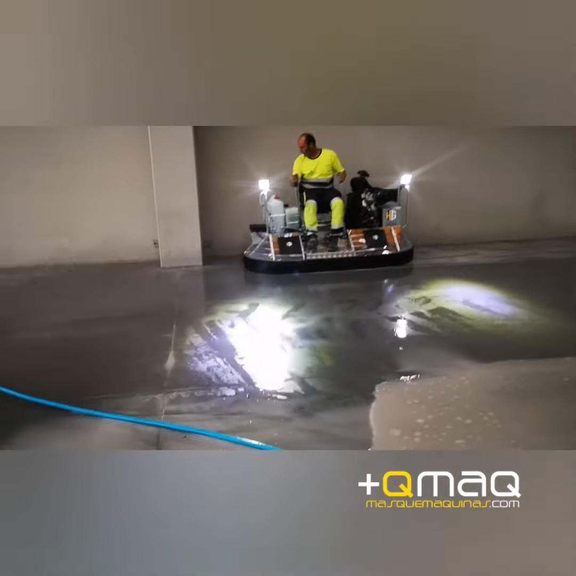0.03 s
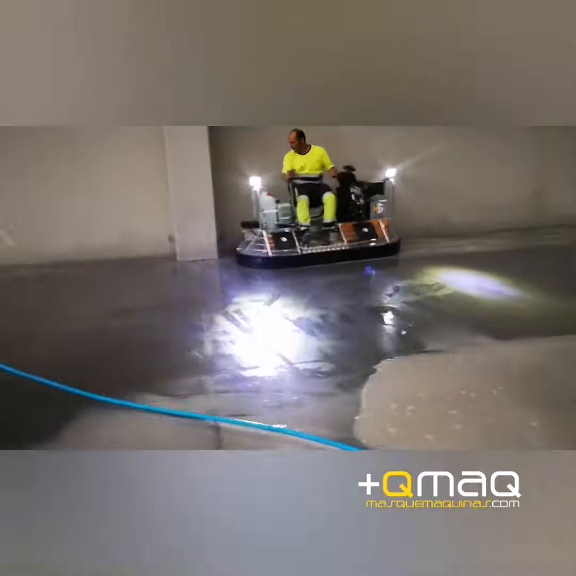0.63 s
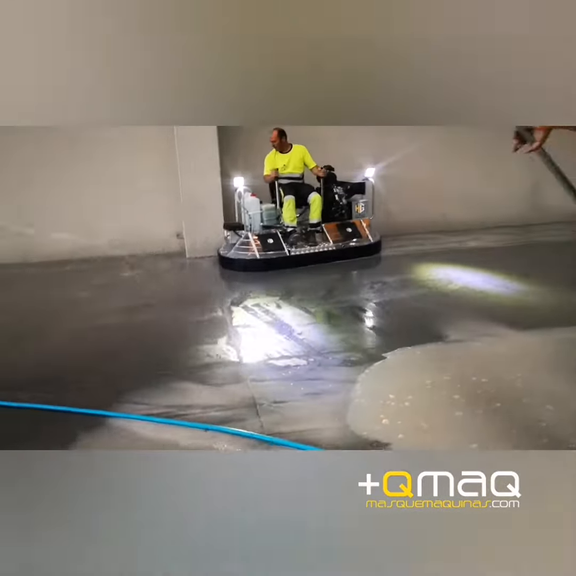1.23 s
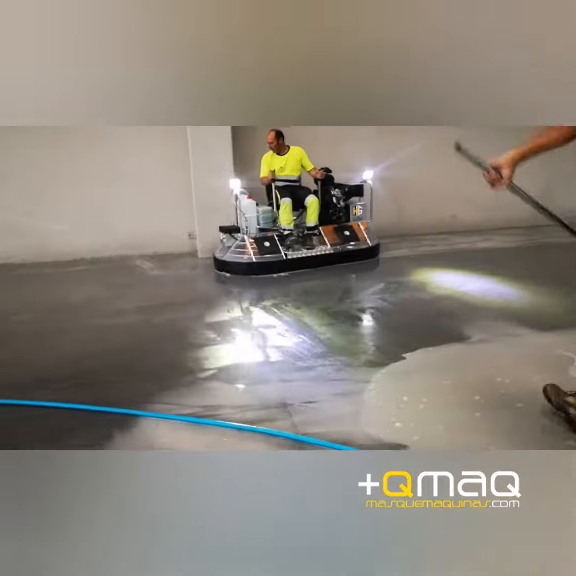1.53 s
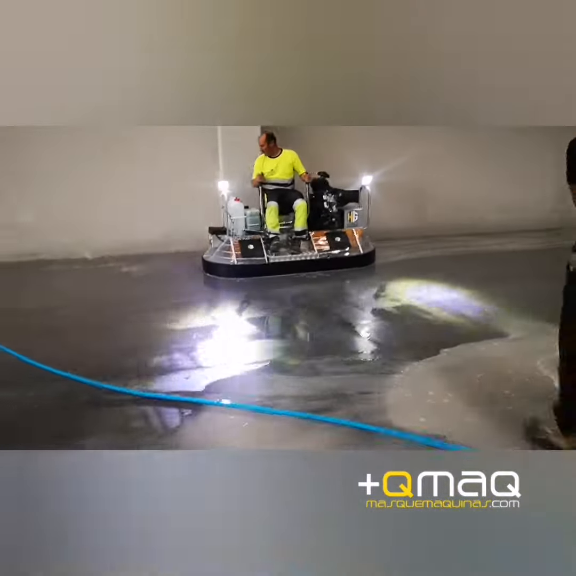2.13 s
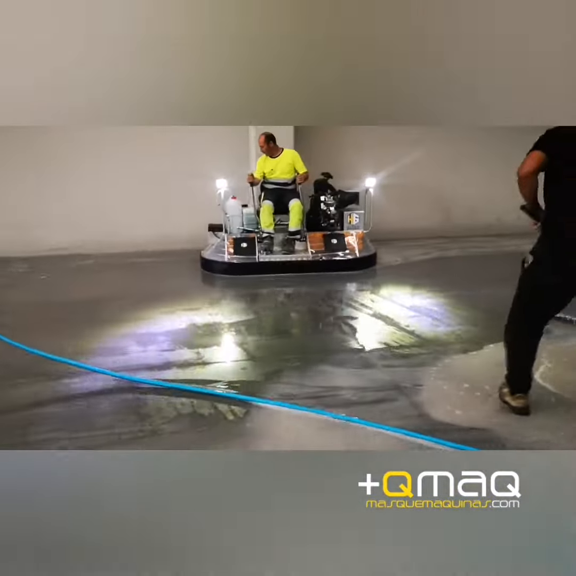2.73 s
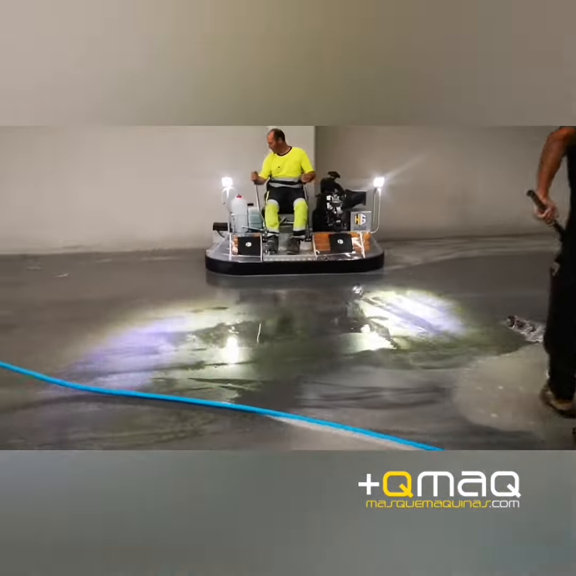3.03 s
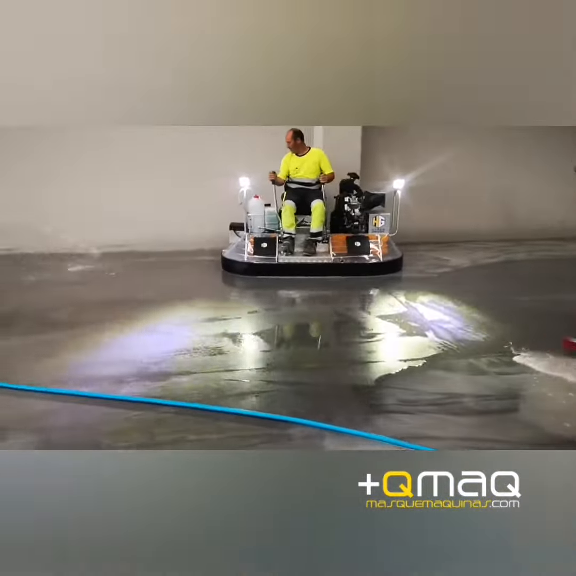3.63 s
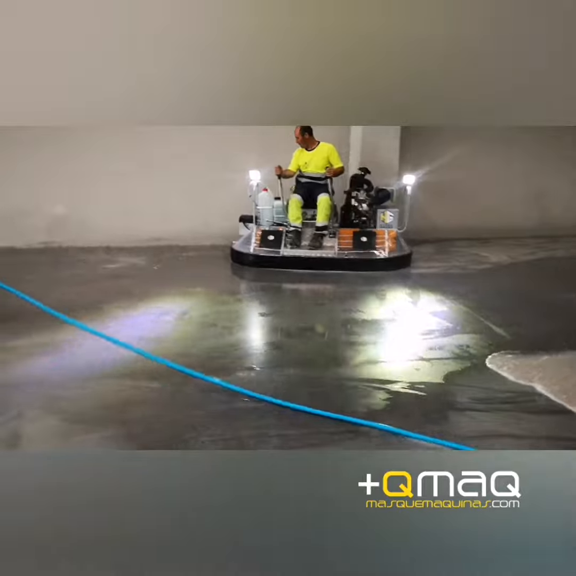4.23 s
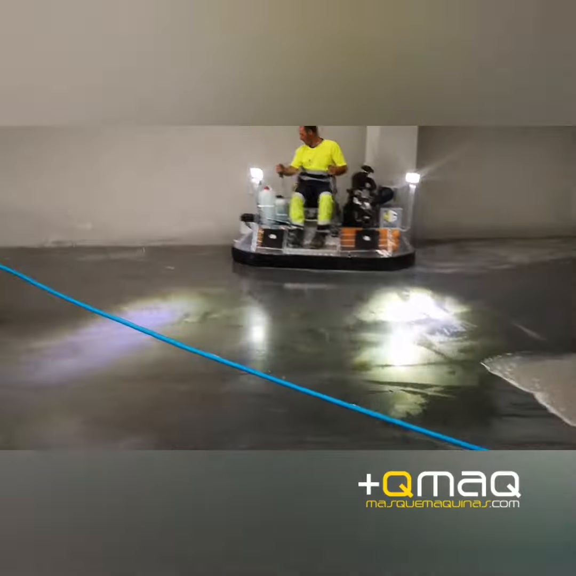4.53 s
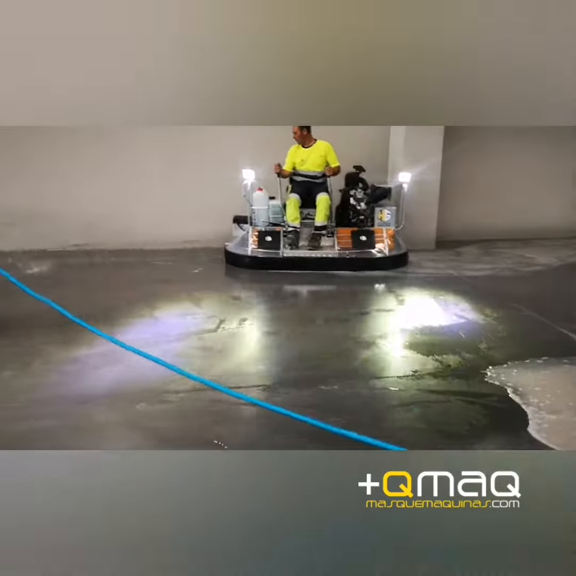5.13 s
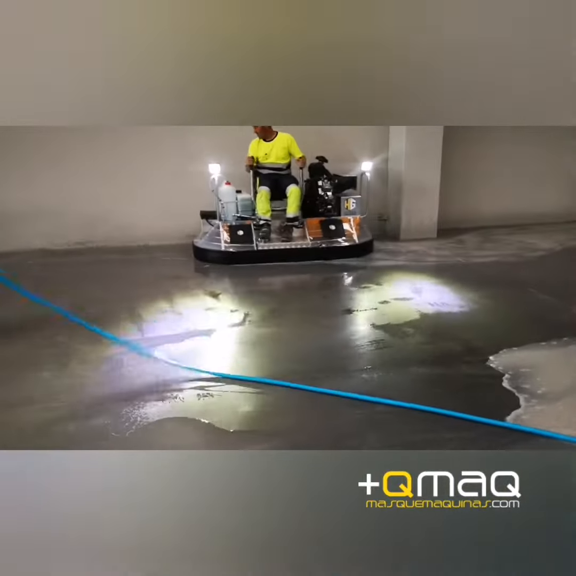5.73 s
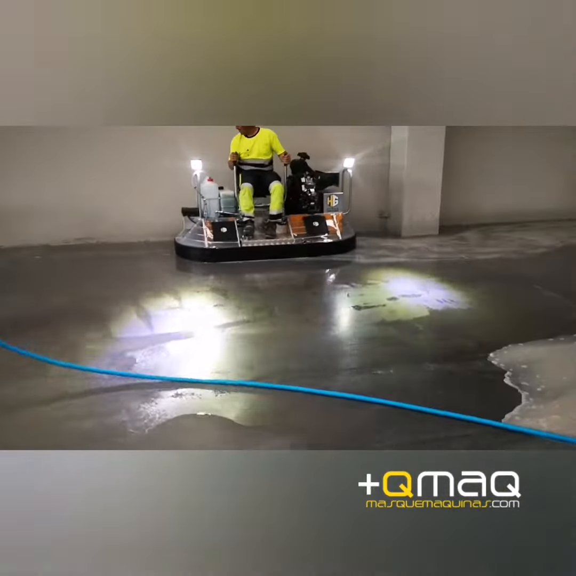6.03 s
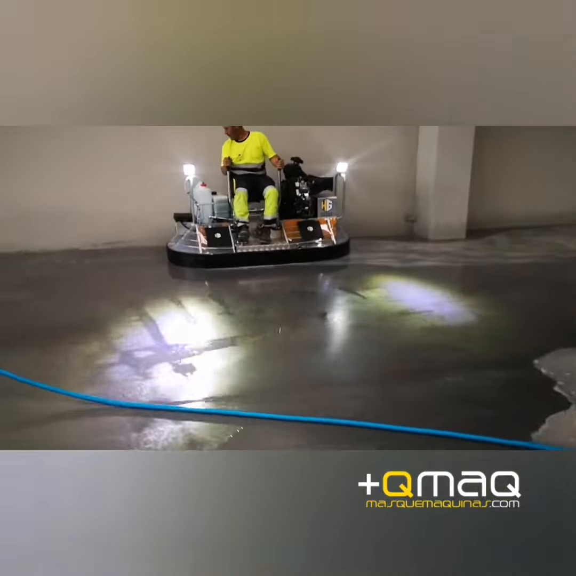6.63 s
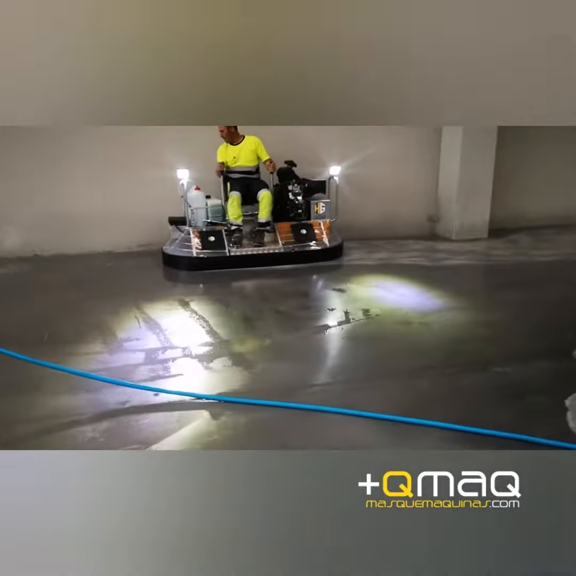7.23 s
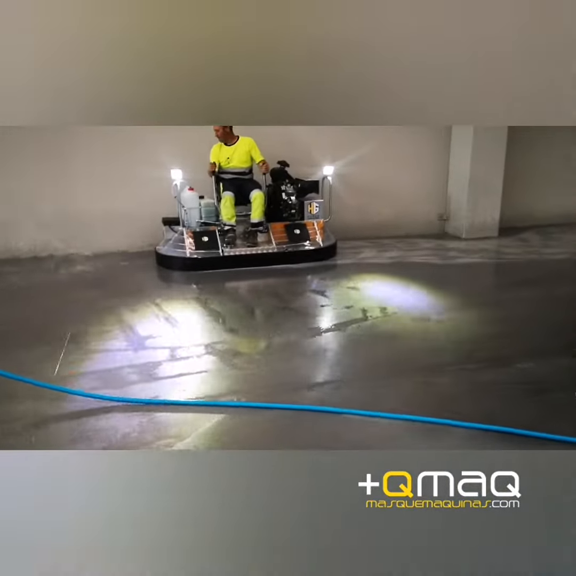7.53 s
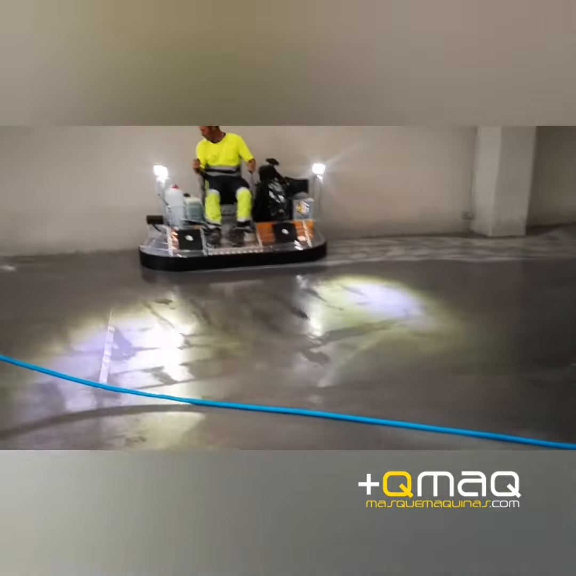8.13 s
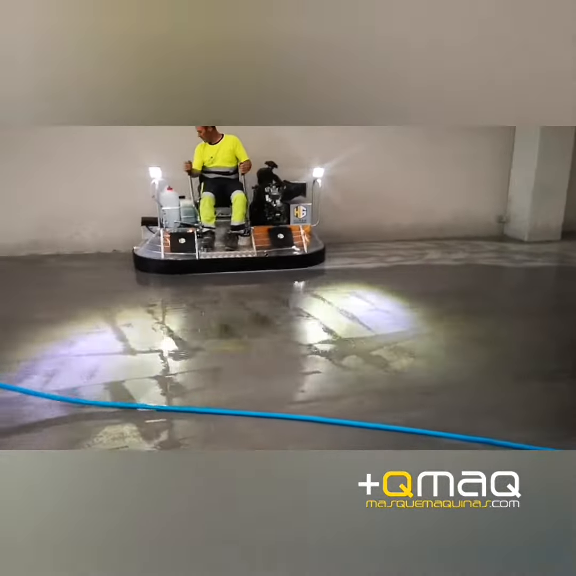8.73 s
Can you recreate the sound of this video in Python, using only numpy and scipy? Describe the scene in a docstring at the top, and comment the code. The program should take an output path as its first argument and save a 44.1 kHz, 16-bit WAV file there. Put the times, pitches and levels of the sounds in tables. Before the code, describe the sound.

Low, swelling engine drone of a floor polishing machine with a gritty, ringing rasp of discs on concrete, echoing indoors.

```python
"""Floor polisher in a bare hall

A ride-on polisher glides over wet concrete, its twin-cylinder engine droning and revving up once.
Each low exhaust harmonic swells and fades as the machine moves through the hall's standing waves.
Over the drone the discs grind, ring and squeak, the cooling fan whines and the valves tick faintly."""
import sys
import numpy as np
from scipy import signal
from scipy.fft import rfft, irfft, next_fast_len
from scipy.io import wavfile
from scipy.ndimage import uniform_filter1d, minimum_filter1d, map_coordinates

SR = 44100
rng = np.random.default_rng(int(sys.argv[2]) if len(sys.argv) > 2 else 0)


def unload_audio(sound):
    """Save the sound as a 16-bit wav file, at the path given as the first command line argument."""
    columns = np.transpose(np.atleast_2d(sound))
    # keep every value between -1 and 1, then stretch to whole-number steps
    steps = np.round(np.clip(columns, -1, 1) * 32767)
    wavfile.write(sys.argv[1], SR, steps.astype(np.int16))


N = 387638

# Level rides of exhaust harmonics 2, 3, 5 and 6 through the standing waves: t/s, level/dB
RIDE_2 = [(0.0, -22.5), (0.58, -19.5), (0.92, -24.5), (1.84, -18.5), (2.65, -20.5), (3.16, -14.0),
          (3.64, -15.5), (3.84, -22.5), (4.8, -15.5), (5.2, -20.0), (6.5, -24.0), (7.35, -14.5),
          (8.78, -13.0)]
RIDE_3 = [(0.0, -17), (0.58, -16.5), (1.16, -13.5), (2.35, -21.5), (2.79, -38), (3.23, -22), (4.46, -15.5),
          (4.66, -19.5), (4.76, -35), (4.97, -18), (5.75, -19), (5.85, -17), (5.95, -11), (7.48, -22),
          (8.2, -15.5), (8.78, -27)]
RIDE_5 = [(0.0, -24), (0.65, -31), (0.82, -21.5), (2.86, -19), (3.54, -44), (3.78, -19.5), (4.12, -16.5),
          (4.69, -40), (5.85, -18.5), (7.04, -16.5), (7.45, -27.5), (7.72, -12.5), (8.27, -22.5),
          (8.78, -16.5)]
RIDE_6 = [(0.0, -15.5), (1.94, -17), (2.48, -35), (2.86, -22), (3.5, -17), (3.64, -26), (3.88, -15.5),
          (4.22, -30.5), (4.9, -21.5), (5.03, -31.5), (5.41, -16.5), (6.02, -27.5), (6.9, -17.5),
          (7.14, -23.0), (8.33, -17), (8.78, -27.5)]
STRONG_HARMONICS = {2: RIDE_2, 3: RIDE_3, 5: RIDE_5, 6: RIDE_6}
# Fill of the drone: harmonic number, low-throttle level/dB, high-throttle level/dB
WEAK_HARMONICS = [(4, -35, -29.5), (7, -31, -34.5), (9, -39, -42.5), (10, -36, -39), (11, -41, -41),
                  (12, -43.5, -61), (13, -41, -52.5), (14, -52, -53.5), (17, -61, -57.5), (19, -62.5, -55),
                  (20, -58, -58), (21, -55, -75), (34, -62, -60), (36, -56, -49), (40, -74, -56)]
# Extra ride on harmonics 9 to 11: t/s, level/dB
UPPER_RIDE = [(.2, -3.5), (1.3, 4), (2.1, 0.5), (2.8, 2), (3.7, -2.5), (5.3, 1), (6.7, -3), (7.5, 4),
              (8.7, -0.5)]
# Tone of the exhaust gas: f/Hz, level/dB
PUFF_EQ = [(15, -24), (35, -5), (90, -7.5), (170, 0), (260, -8.5), (340, -12.5), (420, -14.5), (500, -11),
           (570, -28.5), (900, -50), (2000, -60)]
# Bite of the discs on the slab: t/s, rasp level/dB, grit level/dB
BITE_RIDE = [(0.1, -32, -37), (0.55, -32, -35.5), (1.53, -34.5, -37), (2.13, -31, -32.5),
             (3.07, -30, -33.5), (3.47, -32.5, -37), (4.86, -29, -33), (5.46, -32, -34.5), (5.63, -28, -31),
             (5.7, -30.5, -33.5), (6.11, -34.5, -37.5), (6.25, -33, -36.5), (6.73, -35, -38.5),
             (7.31, -31.5, -35), (8.48, -34, -37), (8.7, -33.5, -37)]
# Midrange rasp of the grinding: f/Hz, level/dB
RASP_EQ = [(200, -14), (450, -7), (650, -4), (880, 0.5), (1100, 0), (1310, -3.5), (1600, -1), (2200, 0.5),
           (2720, -2.5), (2850, -3.5), (3150, -6), (3500, -13.5), (6000, -45)]
# Bright hiss of the grit: f/Hz, level/dB
GRIT_EQ = [(1500, -13), (3400, -1), (3900, 1), (4250, 0), (4950, -0.5), (5400, 1.5), (5850, 3),
           (6300, -2.5), (7100, 2.5), (7900, 0.5), (8300, -4.5), (8900, -6), (10000, -19), (15000, -21.5)]
# Resonances of the discs and their housings: f/Hz, width/Hz, level/dB
DISC_MODES = [(870, 20, -6.5), (1376, 31, -6), (2150, 30, -10), (2686, 68, -2), (3243, 59, -5.5),
              (3837, 180, -8), (4497, 160, -8.5), (5380, 70, -9), (6950, 70, -7.5)]
# Swell of the singing disc: t/s, level/dB
SINGING_RIDE = [(1.6, -52), (2.3, -40), (4.1, -40), (4.6, -38), (6.3, -52.5), (7.6, -39.5), (8.79, -45)]
# Moments when a disc catches: t/s, f/Hz, half length/s, level/dB
DISC_CATCHES = [(2.52, 7100, 0.055, -36), (2.73, 7080, .03, -50), (4.33, 4500, 0.033, -38)]
# Decay of the hall: f/Hz, T60/s
HALL_DECAY = [(100, 2.6), (1000, 1.5), (4000, 0.54), (12000, .5)]
# Stereo image of the scattered noise: f/Hz, left-right correlation
STEREO_CORRELATION = [(60, .999), (130, 0.98), (290, .88), (450, 0.17), (700, 0.16), (1400, 0.28),
                      (3000, 0.11), (15000, 0.06)]
# Balance of the whole mix: f/Hz, left minus right level/dB
STEREO_TILT = [(400, 0), (750, 0.5), (1300, -1.2), (2400, -5.5), (4400, -0.5), (6000, -2), (7200, -2.5),
               (9000, 3), (15000, -1)]

REV_S, REV_LENGTH_S = 5.5, 0.3  # when the throttle opens, and how long that takes


def engine():
    """Throttle (0-1), running count of firing cycles and unevenness of the firing, sample by sample."""
    t = np.arange(N) / SR
    throttle = np.clip((t - REV_S) / REV_LENGTH_S, 0, 1)
    low_hz = 21.73 + 0.06 * t  # creeps up
    high_hz = 24.82 - 0.28 * (t - REV_S)  # sags under the load
    hunt_hz = 0.0403 * wobble(2)  # the governor never quite holds the speed
    cycle_hz = low_hz + throttle * (high_hz - low_hz) + hunt_hz
    rev_stumble = np.exp(-((t - REV_S - REV_LENGTH_S) / 0.52) ** 2)
    return throttle, np.cumsum(cycle_hz) / SR, 0.057 + 0.21 * rev_stumble


def exhaust(cycles, throttle, rough):
    """The drone: strong harmonics ride the standing waves, the 8th dips at nodes, weak ones wander."""
    throb = harmonic(cycles, 1, drift=0.25, spread=0.01, rough=rough)
    drone = amp(-41 + 13 * throttle) * throb
    for k, ride in STRONG_HARMONICS.items():
        sway_db = 0.43 * wobble(4)  # the machine shifts about
        db = curves(ride)[0] + 0.84 + sway_db
        drone += amp(db) * harmonic(cycles, k, drift=0.5, spread=0.014, rough=rough)
    first_node_s, node_gap_s, wall_echo = 1.595, 1.65, 0.45
    nodes = (np.arange(N) / SR - first_node_s) / node_gap_s
    standing_wave = np.abs(1 - wall_echo * np.exp(2j * np.pi * nodes))
    eighth = harmonic(cycles, 8, drift=0.3, spread=0.015, rough=rough)
    drone += amp(-28 - 4 * throttle) * standing_wave * eighth
    upper_db, = curves(UPPER_RIDE)
    for k, low_db, high_db in WEAK_HARMONICS:
        db = low_db + throttle * (high_db - low_db) + 2 * wobble(3.487)
        if 9 <= k <= 11:
            db += upper_db
        drone += amp(db) * harmonic(cycles, k, drift=0.65, spread=0.026, rough=rough + 0.18)
    return drone


def harmonic(cycles, k, drift, spread, rough):
    """One exhaust partial; the changing path turns its phase, a little differently left and right."""
    phase = 2 * np.pi * (k * cycles + rng.random()) + drift * wobble(0.76)
    stereo_phase = spread * k * wobble(0.95) * np.array([[1], [-1]])
    strength = 1 + rough * wobble(24)  # firings differ in punch
    jitter = rough * wobble(24)  # and in timing
    return np.sqrt(2) * strength * np.sin(phase + stereo_phase + jitter)


def rev_flutter(drone):
    """During the rev the hall still holds the lower pitches, which beat against the new ones."""
    t = np.arange(N) / SR
    send = np.exp(-((t - REV_S - REV_LENGTH_S / 2) / (REV_LENGTH_S / 2)) ** 2)
    echo = hall(drone.mean(0) * send).mean(0)
    peak_rms = np.sqrt(uniform_filter1d(echo ** 2, size=SR // 4).max())
    return amp(-20) * echo / peak_rms


def discs(cycles, rasp_db, grit_db, throttle):
    """Abrasive discs rasp and hiss over the slab, swelling as they turn, and their metal rings."""
    def modes(hz):
        return np.sqrt(sum((amp(db) * resonance(hz, f, width)) ** 2 for f, width, db in DISC_MODES))
    turning = np.sin(2 * np.pi * 2.9 * np.arange(N) / SR)
    rasp = amp(rasp_db + 2 + 0.14 * turning + 0.55 * wobble(25)) * noise_bed(RASP_EQ)
    valve_ticks = 1 + 0.087 * strokes(cycles, offset=0.077, decay=0.11)
    hiss = amp(grit_db + 2.5 + 0.1 * turning + 0.55 * wobble(40)) * valve_ticks * noise_bed(GRIT_EQ)
    ring = amp(grit_db - 5 - throttle + 2.5 * wobble(9)) * diffuse(modes)
    return rasp + hiss + ring


def puffs(cycles, load_db):
    """Turbulent gas chuffs out of the silencer with every firing, more of it under load."""
    db = load_db + 0.4 + 0.4 * wobble(4.35)
    pulsing = 1 + 0.12 * strokes(cycles, offset=0.375, decay=0.26)
    return amp(db) * unit(noise_bed(PUFF_EQ) * pulsing)


def fan(cycles, level_db):
    """The cooling fan whines at 60 times the shaft speed, shaken by each firing, blurred by the hall."""
    shaft_turns = 2 * cycles
    shake = 1.4 * wobble(90) + 1.4 * np.sin(2 * np.pi * cycles)
    whine = np.sin(2 * np.pi * 60 * shaft_turns + shake)
    return amp(level_db) * hall(whine)


def singing_disc():
    """One sharp resonance of a disc, kept ringing unevenly by friction."""
    db = curves(SINGING_RIDE)[0] + wobble(8)
    return amp(db) * diffuse(lambda hz: resonance(hz, centre_hz=2912, width_hz=60))


def squeaks():
    """Brief, thin squeals as a disc catches on the wet slab."""
    t = np.arange(N) / SR
    out = np.zeros((2, N))
    for at_s, hz, half_s, db in DISC_CATCHES:
        waver = 0.69 * np.array([wobble(100), wobble(83)])
        envelope = amp(db) * np.exp(-((t - at_s) / half_s) ** 2)
        out += envelope * np.sqrt(2) * np.sin(2 * np.pi * hz * t + waver)
    return out


def hall(x):
    """Fully wet reverb at rms 1, its tail darkening as it dies; the source is already sounding."""
    hz, t, noise = signal.stft(rng.standard_normal((2, SR)), SR, nperseg=256)
    decay = amp(-60 * t / along(HALL_DECAY, hz)[:, None])
    tail = signal.istft(noise * decay, SR)[1]
    pre_rolled = np.pad(x, (SR, 0), mode="reflect")
    return unit(signal.fftconvolve(pre_rolled[None], tail, axes=1)[:, SR:SR + N])


def diffuse(colour):
    """Hall-scattered noise at rms 1, shaped by colour(hz): centred in the bass, wide in the treble."""
    def response(hz):
        width = np.arccos(np.clip(along(STEREO_CORRELATION, hz), -1, 1)) / 2
        return colour(hz) * np.array([np.cos(width), np.sin(width)])
    mid, side = filtered(rng.standard_normal((2, N)), response)
    return unit(np.array([mid + side, mid - side]))


def noise_bed(eq):
    """Diffuse noise through an EQ curve."""
    return diffuse(lambda hz: amp(along(eq, hz)))


def strokes(cycles, offset, decay):
    """Zero-mean pulses, one per cylinder; the second one's offset and the decay are in cycles."""
    bursts = np.exp(-(cycles % 1) / decay) + np.exp(-((cycles - offset) % 1) / decay)
    return unit(bursts - bursts.mean())


def resonance(hz, centre_hz, width_hz):
    """A resonant peak of height 1."""
    return 1 / (1 + (2 * (hz - centre_hz) / width_hz) ** 2)


def wobble(rate, size=2048):
    """Smooth random modulation, rate new values a second."""
    positions = np.linspace(0, N / SR * rate, size)
    coarse = map_coordinates(rng.standard_normal(size), [positions], mode="wrap")
    return np.interp(np.arange(N), np.linspace(0, N, size), coarse)


def curves(rows):
    """Automation lanes, one for each column after the time."""
    times, *columns = np.transpose(rows)
    return [np.interp(np.arange(N) / SR, times, column) for column in columns]


def along(points, hz):
    """Breakpoints joined on a log frequency axis."""
    freqs, values = np.transpose(points)
    return np.interp(np.log(hz + 1), np.log(freqs + 1), values)


def filtered(x, response):
    """Zero-phase EQ with gain response(hz)."""
    size = next_fast_len(N + SR // 4)
    return irfft(rfft(x, size) * response(np.fft.rfftfreq(size, 1 / SR)), size)[..., :N]


def amp(db):
    """Decibels to gain."""
    return 10 ** (np.asarray(db) / 20)


def unit(x):
    """Normalised to rms 1."""
    return x / np.sqrt(np.mean(x ** 2) + 1e-20)


def scene():
    """The mix: the throttle drives the pitch, the bite of the discs rides the noise and fan levels."""
    throttle, cycles, rough = engine()
    rasp_db, grit_db = curves(BITE_RIDE)
    drone = exhaust(cycles, throttle, rough)
    whine = fan(cycles, level_db=rasp_db - 9.5 + 2.5 * throttle)
    machine = drone + rev_flutter(drone) + puffs(cycles, load_db=rasp_db) + whine
    floor = discs(cycles, rasp_db, grit_db, throttle) + singing_disc() + squeaks()
    sides = np.array([[0.5], [-0.5]])
    return filtered(machine + floor, lambda hz: amp(along(STEREO_TILT, hz) * sides))


def record(dry):
    """Master chain: a gentle limiter ducks the tallest peaks, then a brick-wall low-pass."""
    ceiling, window, cutoff_hz = 0.82, SR // 20, 15150
    needed = np.minimum(1, ceiling / (np.abs(dry).max(0) + 1e-9))
    gain = uniform_filter1d(minimum_filter1d(needed, size=window), size=window)
    return filtered(dry * gain, lambda hz: hz < cutoff_hz)


dry = scene()
out = record(dry)
unload_audio(out)
```